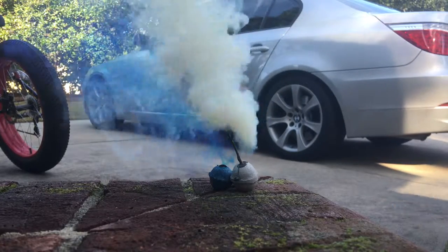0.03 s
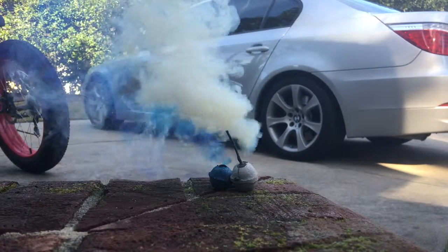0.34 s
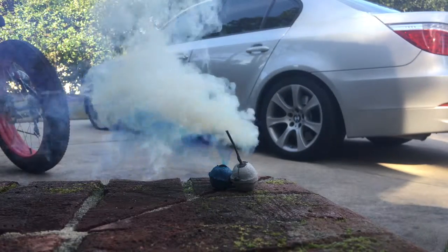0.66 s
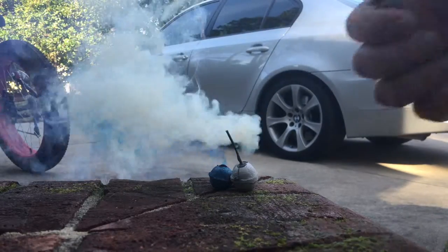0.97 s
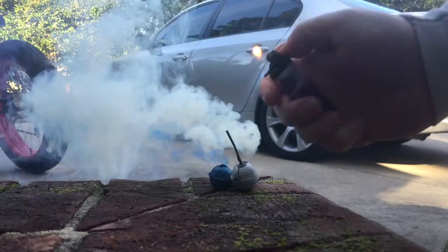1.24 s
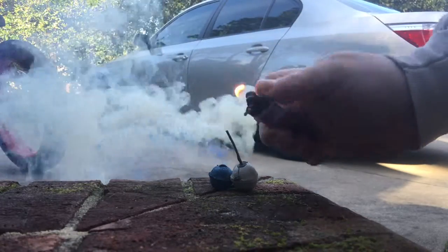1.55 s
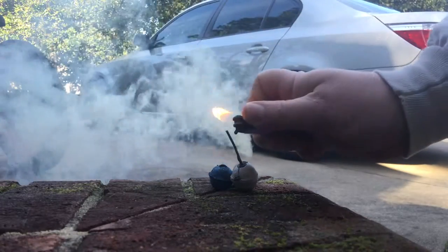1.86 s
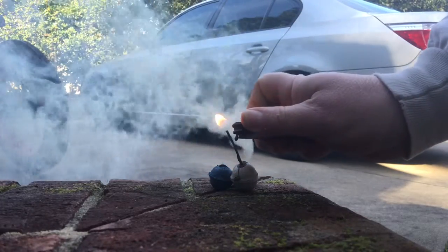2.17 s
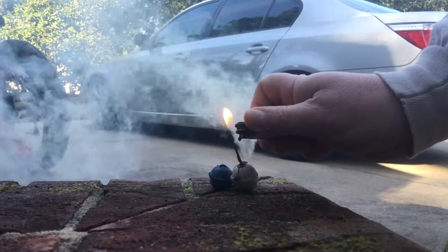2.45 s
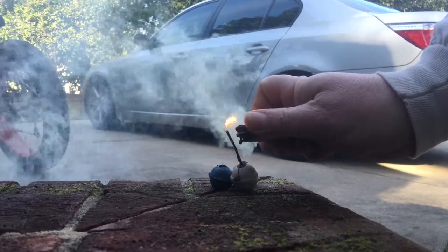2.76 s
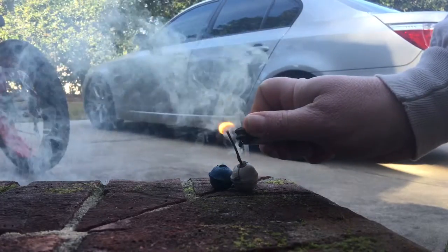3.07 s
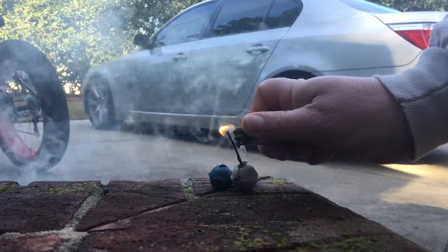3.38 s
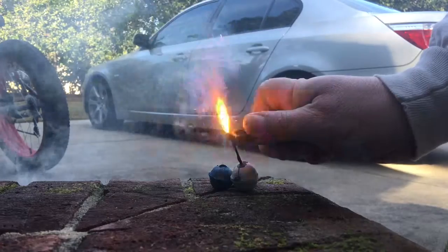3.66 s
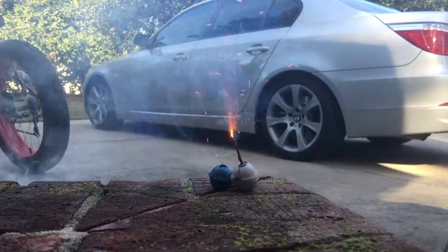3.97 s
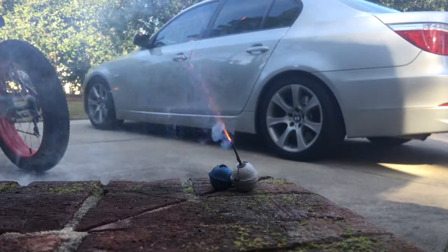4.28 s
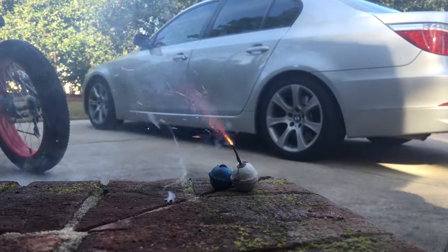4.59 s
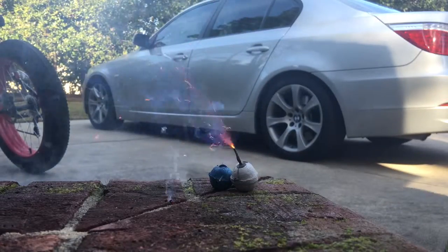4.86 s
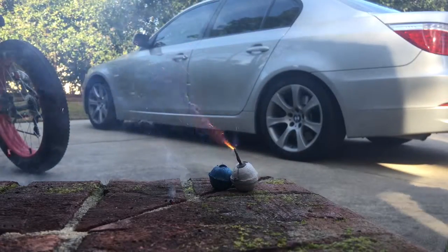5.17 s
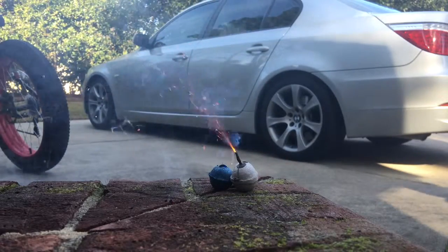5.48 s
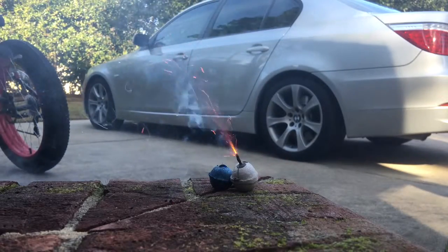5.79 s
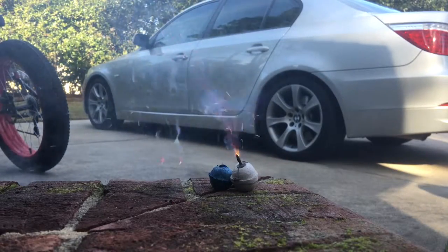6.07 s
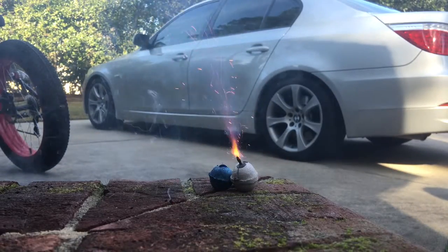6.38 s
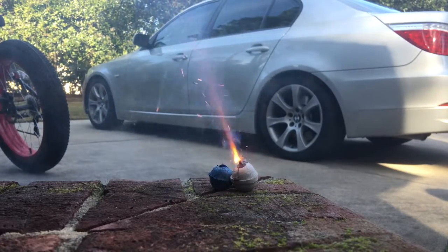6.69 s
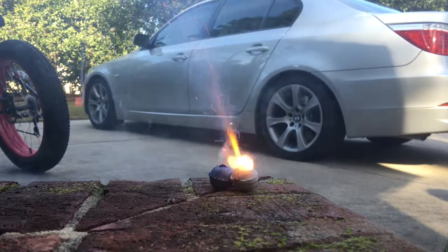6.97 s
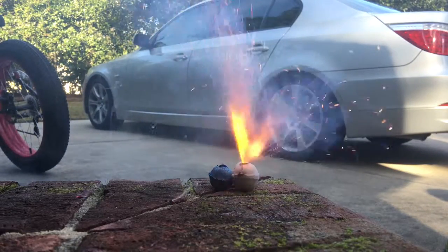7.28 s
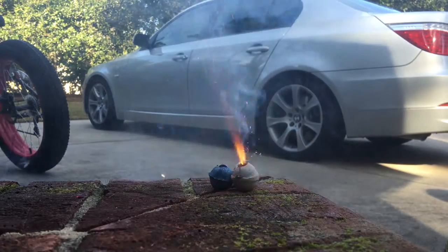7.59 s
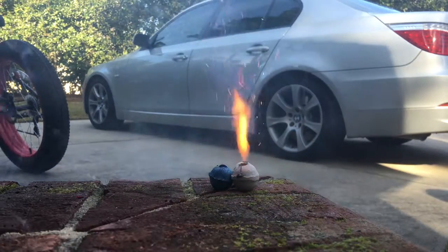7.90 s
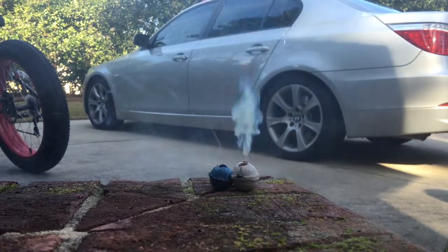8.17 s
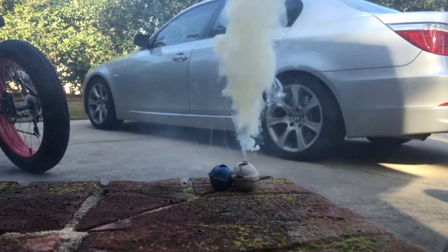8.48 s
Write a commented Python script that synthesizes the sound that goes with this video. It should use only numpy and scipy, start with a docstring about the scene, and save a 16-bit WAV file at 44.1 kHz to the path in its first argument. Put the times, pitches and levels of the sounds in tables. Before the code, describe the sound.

Close by on an outdoor step, one short lighter rasp cuts through the weak, gritty puffing of a dying smoke ball. A fuse then takes fire and hisses and spits unevenly, with a small flame fluttering beneath it later on. Loud rushing bursts follow as the fire enters the shell, giving way to a quiet hiss of smoke. Distant traffic and idling engines hum faintly throughout.

```python
"""A smoke ball's fuse catches, hisses and spits as it burns down, flares as it enters the shell and gives
way to a soft jet of smoke. The hiss is a fluttering gas jet full of bursting powder grains; a flame
flaps at the vent. Before the fuse catches, a spent ball sputters out and a flint lighter is struck.
Both balls sit on a brick step outdoors, close to a phone. Distant traffic rumbles underneath."""
import sys
import numpy as np
from scipy import signal
from scipy.fft import rfft, irfft, next_fast_len
from scipy.io import wavfile

SR = 44100
rng = np.random.default_rng(int(sys.argv[2]) if len(sys.argv) > 2 else 0)


def bounce(signal):
    """Save signal as a 16-bit WAV file at the path given by the first command-line argument."""
    frames = np.transpose(np.atleast_2d(signal))
    limited = np.clip(frames, -1, 1)
    pcm = np.round(limited * 32767).astype(np.int16)
    wavfile.write(sys.argv[1], SR, pcm)


N = 376613
T = np.arange(N) / SR
CATCH_S = 3.724  # fuse takes fire


# Open jet spectrum: (frequency [Hz], relative density [dB])
JET_SPECTRUM = [(100, -8), (250, -9), (600, -4.5), (1200, -6), (2700, -3), (4700, -1.5), (8000, -1),
                (10000, -1.5), (13000, -4.5), (15800, -9)]
# Broad dip in the hiss, climbing as the fuse shortens: (time [s], centre [Hz], depth [dB])
HISS_HOLLOW = [(3.8, 6600, 3), (3.93, 6540, 8.5), (4.15, 8400, 6.5), (4.6, 9200, 7), (5.1, 9700, 8),
               (5.6, 10570, 8.5), (6.2, 10900, 4.5), (7.25, 11000, 6.5), (7.42, 7350, 11.5),
               (7.7, 10700, 6.5), (8.0, 12500, 2)]

def fuse(grit_db=-6, hollow_width_hz=3400, catch_rise_s=0.0079):
    """Powder grains burst in a fluttering gas jet, with a hollow body below and sparks sizzling on top."""
    gas = rng.standard_normal(N)
    jet, body, sizzle = burn_gains()
    # harder burning merges the spurts into an even rush
    spurts = np.clip((-8 - 20 * np.log10(jet)) / 22, 0, 1)
    source = unit(gas + spurts * undb(grit_db) * crackle(rate_hz=2600, spread_db=3.0))
    flutter_db = spurts * (1.03 * walk(70) + 0.26 * walk(450))
    hz, t, frames = signal.stft(unit(source * undb(flutter_db)), SR, nperseg=512)
    hz = hz[:, None]
    centre_hz, depth_db = curves(HISS_HOLLOW, t)
    dips_db = depth_db * bell(hz, centre_hz, hollow_width_hz) + comb_db(hz, t)
    colour = undb(spectrum(JET_SPECTRUM, hz) + port_db(hz) - dips_db)
    low = 1 / (1 + (hz / 1350) ** 8)
    high = 1 - 1 / (1 + (hz / 10200) ** 16)
    hiss = 0
    for share, strength in ((1 - low - high, jet), (low, body), (high, sizzle)):
        gain = colour * share
        gain = gain / np.sqrt(np.mean(gain ** 2, axis=0))
        hiss = hiss + signal.istft(frames * gain, SR)[1][:N] * strength
    caught = np.clip((T - CATCH_S) / catch_rise_s, 0, 1)
    return shape(hiss * caught, lambda hz: 1 - bell(hz, 0, 145))  # small jet, no deep bass


# Powder burn, fuse then shell: (time [s], jet level [dB])
BURN_LEVEL = [(3.73, -33.5), (4.35, -31.5), (4.7, -31.5), (5.68, -31), (5.78, -29), (6.3, -29.5),
              (6.5, -32.5), (6.73, -27), (6.87, -27), (6.93, -30.3), (7.13, -28), (7.46, -34), (7.83, -22),
              (7.975, -24.5), (8.025, -44.5), (8.39, -54.5), (8.53, -41.5)]
# Powder runs thin: (time [s], width [s], sizzle drop [dB])
BURN_FALTERS = [(3.893, 0.04, 8), (4.202, 0.051, 3), (4.373, 0.22, 3), (4.828, 0.061, 5.5),
                (4.962, 0.034, 3), (5.185, 0.028, 2.5), (5.298, 0.029, 4), (5.425, 0.046, 3),
                (5.67, 0.071, 4), (5.904, 0.049, 3.5), (6.02, .05, 4), (6.176, 0.081, 10.5),
                (7.007, 0.053, 1.5)]
# Powder pockets go up: (start [s], length [s], rise [s], jet [dB], body [dB], sizzle [dB])
BURN_FLARES = [(3.702, .18, 0.035, -31.5, -31.5, -44), (3.738, .08, 0.058, -30.5, -44, -25),
               (5.73, .09, 0.037, -35, -51, -40), (6.178, 0.077, .04, -35, -39.5, -50),
               (6.498, .06, .04, -50, -37.5, -52), (6.84, .04, .04, -45, -36, -55),
               (6.987, 0.052, .04, -44, -36.5, -58), (7.144, 0.12, 0.047, -12, -30.5, -20.5),
               (7.259, 0.04, .03, -31, -31.5, -45), (7.323, .09, .04, -44, -39, -36),
               (7.45, .06, 0.037, -43, -36.5, -50), (7.623, 0.084, .04, -29.5, -47, -37),
               (7.776, 0.035, 0.036, -29, -33, -33), (7.9, 0.047, .04, -32, -35.5, -31),
               (8.026, 0.13, 0.036, -51, -50, -60)]

def burn_gains(body_db=-11, sizzle_db=(1.4, -8), sizzle_fade_s=(4.6, 6.33)):
    """Jet, body and sizzle follow the burn, sink in each falter and leap in each flare."""
    lags_s, falls_db_per_s = (0, 0.021, 0), (265, 97, 330)  # jet, body, sizzle
    burn_db, = curves(BURN_LEVEL)
    falter_db = sum(db * bell(T, s, width_s) for s, width_s, db in BURN_FALTERS)
    steady_db = (burn_db - 0.62 * falter_db,
                 burn_db + body_db - 0.27 * falter_db,
                 burn_db + np.interp(T, sizzle_fade_s, sizzle_db) - falter_db)
    power = undb(steady_db) ** 2
    for start_s, length_s, rise_s, *levels_db in BURN_FLARES:
        for layer, db in enumerate(levels_db):
            flare = envelope(start_s + lags_s[layer], length_s, rise_s, falls_db_per_s[layer])
            power[layer] += (undb(db) * flare) ** 2
    return np.sqrt(power)


def comb_db(hz, t, start_hz=1022, climb_hz_per_s=62, width_hz=480, depth_db=9, fade_s=1.25):
    """Narrow notches, likely from the brick echo, climb and fade as the fuse shortens."""
    age_s = np.maximum(t - CATCH_S, 0)
    spacing_hz = start_hz + climb_hz_per_s * age_s
    notches = sum(bell(hz, k * spacing_hz, width_hz) for k in (5, 7, 8, 9))
    return depth_db * np.exp(-age_s / fade_s) * notches


# Flame spectrum: (frequency [Hz], relative density [dB])
FLAME_SPECTRUM = [(60, -22), (170, 3.5), (300, 5), (600, -0.5), (1200, -14), (2000, -17), (3500, -39),
                  (15800, -60)]

def flame(start_s=6.1, base_db=-45.5, growth_db_per_s=2.5):
    """A growing tongue of flame flaps at the vent until the smoke smothers it."""
    roar = shape(rng.standard_normal(N), lambda hz: undb(spectrum(FLAME_SPECTRUM, hz)))
    flapping = unit(roar * undb(0.95 * walk(45)))
    size = undb(base_db + growth_db_per_s * (T - start_s))
    return flapping * size * envelope(start_s, length_s=2.093, rise_s=.45, fall_db_per_s=170)


# Smoke hiss spectrum: (frequency [Hz], relative density [dB])
SMOKE_SPECTRUM = [(400, -11.5), (1200, 1), (2100, -1), (3200, -1.5), (5000, -0.5), (9000, -8.5),
                  (15800, -12)]
# Dying flow: (time [s], level [dB])
SMOKE_LEVEL = [(0, -58), (.35, -57), (.7, -64.5), (1.15, -68), (1.45, -64), (1.7, -66), (2.45, -64.5),
               (2.85, -69.5), (3.02, -81)]
# Last puffs: (time [s], width [s], hiss level [dB], throat level [dB])
SMOKE_PUFFS = [(0.895, .06, -60.5, -70), (1.076, 0.028, -57, -74), (2.262, 0.13, -56.5, -70),
               (2.476, 0.078, -62, -75), (2.577, 0.045, -70, -68), (2.75, .05, -64, -62),
               (2.945, .035, -64, -75), (3.16, .02, -67, -77), (3.3, .025, -66, -73)]

def spent_ball(throat_hz=1950, throat_width_hz=920):
    """The last smoke leaves the spent ball in weakening, gritty puffs that sound its hollow throat."""
    gas = rng.standard_normal(N) + undb(-3) * crackle(rate_hz=760, spread_db=1.5)
    gas = shape(gas * undb(walk(60)), lambda hz: undb(spectrum(SMOKE_SPECTRUM, hz) + port_db(hz)))
    gas = gas / np.std(band(gas, 2500, 10000))
    throat = unit(shape(gas, lambda hz: bell(hz, throat_hz, throat_width_hz)))
    puff_gain, throat_gain = sum(undb(levels_db)[:, None] * bell(T, s, width_s)
                                 for s, width_s, *levels_db in SMOKE_PUFFS)
    flow_db, = curves(SMOKE_LEVEL)
    return (gas * np.hypot(undb(flow_db), puff_gain) + throat * throat_gain) * (T < CATCH_S)


# Flint rasp spectrum: (frequency [Hz], relative density [dB])
FLINT_SPECTRUM = [(200, -12.5), (650, -15), (1000, -10.5), (1350, -7.5), (2250, -5), (3200, -12.5),
                  (4700, -10), (5800, -1), (8000, -0.5), (10000, -8), (15800, -9)]
# Case and metal hood resonances: (centre [Hz], width [Hz], gain [dB])
HOOD_MODES = [(1820, 75, 9.5), (5870, 130, 2.5), (6270, 110, 3), (7200, 150, -0.5), (11410, 180, 7)]

def lighter():
    """The wheel's teeth rasp over the flint and ring the hood, harder until the thumb slips off."""
    rasp = .6 * rng.standard_normal(N) + crackle(rate_hz=3500, spread_db=2.5)
    hz = np.fft.rfftfreq(2048, 1 / SR)
    hood_db = sum(db * bell(hz, centre_hz, width_hz) for centre_hz, width_hz, db in HOOD_MODES)
    # minimum phase: starts at once, rings on
    cepstrum = irfft(np.log(undb(spectrum(FLINT_SPECTRUM, hz) + hood_db)))
    cepstrum[1:len(hz) - 1] *= 2
    cepstrum[len(hz):] = 0
    ring = irfft(np.exp(rfft(cepstrum)))
    return signal.fftconvolve(unit(rasp) * thumb_stroke(), ring / np.linalg.norm(ring))[:N]


def thumb_stroke(grip_s=1.187, peak_s=1.2125, stop_s=1.2225, stroke_db=-22.5, bite_db=-16.5, fizz_db=-46.5):
    """The wheel grips, speeds up, bites and throws sparks, then stops; the sparks fizz on."""
    rise_db_per_s, fall_db_per_s, fizz_fall_db_per_s = 600.5, 300, 299
    grip_rise_s, bite_width_s = 0.0084, 0.0053
    grip = np.clip((T - grip_s) / grip_rise_s, 0, 1)
    below_peak_db = np.maximum(rise_db_per_s * (peak_s - T), fall_db_per_s * (T - peak_s))
    bite = undb(bite_db) * bell(T, peak_s, bite_width_s)
    turning = grip * np.hypot(undb(stroke_db - below_peak_db), bite)
    fizz = undb(fizz_db - fizz_fall_db_per_s * np.abs(T - stop_s))
    return np.where(T < stop_s, turning, fizz)


# Small snaps: (time [s], peak before trim [dB], centre [Hz])
TICK_EVENTS = [(0.813, -37, 8660), (1.251, -34, 10000), (1.286, -35, 11000), (2.819, -34, 12100),
               (3.3736, -32, 12000), (3.399, -36.5, 12100), (3.5773, -37, 11500), (3.5816, -35, 15200),
               (3.711, -41, 8280), (8.3492, -29, 7500)]

def ticks(decay_s=0.00082, width_hz=18000, top_hz=15850, trim_db=-1.0):
    """Lighter, heating fuse tip and shell give bright snaps about a millisecond long."""
    out, t = np.zeros(N), T[:512]
    hz = np.fft.rfftfreq(len(t), 1 / SR)
    for s, db, centre_hz in TICK_EVENTS:
        colour = bell(hz, centre_hz, width_hz) * undb(port_db(hz)) * (hz > 1200) * (hz < top_hz)
        noise = irfft(rfft(rng.standard_normal(len(t))) * colour)
        snap = noise * t * np.exp(-2 * t / decay_s)
        start = int(s * SR)
        out[start:start + len(t)] += undb(db + trim_db) * snap / np.abs(snap).max()
    return out


# Distant traffic spectrum: (frequency [Hz], relative density [dB])
TRAFFIC_SPECTRUM = [(20, -44), (32, -30), (48, -7.5), (62, -6.5), (76, -8.5), (99, -2.5), (126, -2.5),
                    (160, -12), (240, -13), (380, -20), (500, -29), (1000, -29), (1800, -39), (2500, -46)]
# Idling engines: (pitch [Hz], peak level [dB], peak time [s], slope either side [dB/s])
ENGINE_NOTES = [(78.2, -44.5, 3.7, 3), (76.3, -46.5, 7.3, 3.5), (124.2, -52, 1.8, 3), (123, -42, 8.9, 2.5),
                (239.4, -55, 1.25, 11)]

def traffic(rumble_db=-44, wash_db=-56.5, wash_fade_db_per_s=1.5):
    """Low rumble, a fading wash of tyres and the wavering notes of idling engines."""
    road = shape(rng.standard_normal(N),
                 lambda hz: undb(spectrum(TRAFFIC_SPECTRUM, hz)) / (1 + (hz / 2200) ** 4))
    low = shape(road, lambda hz: 1 / (1 + (hz / 380) ** 4))
    rumble = low / np.std(band(road, 40, 140)) * undb(rumble_db)
    wash = (road - low) / np.std(band(road, 545, 1400)) * undb(wash_db - wash_fade_db_per_s * T)
    engines = 0
    for hz, db, peak_s, slope_db_per_s in ENGINE_NOTES:
        phase = 2 * np.pi * np.cumsum(hz * (1 + .018 * walk(12))) / SR
        note = unit(np.sin(phase) * undb(2.2 * walk(15)))
        engines = engines + undb(db - slope_db_per_s * np.abs(T - peak_s)) * note
    return rumble + wash + engines


def faint_hiss(level_db=-71.5, corner_hz=4500):
    """A thin, even hiss lies under everything."""
    hiss = shape(rng.standard_normal(N), lambda hz: undb(port_db(hz) / 2) / np.hypot(1, hz / corner_hz))
    return undb(level_db) * unit(hiss)


def driveway(x, t60_s=0.15, wet_db=-29, delay_s=.008):
    """Car and house scatter a short, faint tail."""
    t = T[:SR // 2]
    tail = rng.standard_normal(len(t)) * undb(-60 * t / t60_s) * (t > delay_s)
    return x + undb(wet_db) * signal.fftconvolve(x, tail / np.linalg.norm(tail))[:N]


# Microphone port resonances and dips: (centre [Hz], width [Hz], gain [dB])
PORT_MODES = [(1900, 920, 7.5), (2820, 390, -2), (3560, 1160, 4.5), (4710, 960, -3), (5300, 330, 2.5),
              (7170, 520, 2), (7680, 340, -3), (8820, 1400, 3.5), (10520, 860, -4), (12110, 670, 3),
              (13300, 590, 2), (14130, 320, 1.5)]

def port_db(hz):
    """The microphone port colours nearby hiss."""
    return sum(db * bell(hz, centre_hz, width_hz) for centre_hz, width_hz, db in PORT_MODES)


def undb(db):
    """Decibels to gain."""
    return 10 ** (np.asarray(db) / 20)


def unit(x):
    """Scale to rms 1."""
    return x / np.sqrt(np.mean(x ** 2))


def curves(table, t=T):
    """Table columns, linearly interpolated in time."""
    s, *columns = np.transpose(table)
    return [np.interp(t, np.sort(s), column) for column in columns]


def spectrum(points, hz):
    """Level in dB, interpolated over log frequency."""
    points_hz, db = np.transpose(points)
    return np.interp(np.log(hz + 1), np.log(points_hz), db)


def bell(x, centre, width):
    """Gaussian of height 1; full width at half height."""
    return .5 ** ((2 * (x - centre) / width) ** 2)


def envelope(start_s, length_s, rise_s, fall_db_per_s):
    """Swell toward 1, hold, decay once the length is over."""
    swell = np.clip((T - start_s) / rise_s, 0, 1) ** 2
    return swell * undb(-fall_db_per_s * np.maximum(T - start_s - length_s, 0))


def shape(x, gain):
    """Filter by a function of frequency."""
    size = next_fast_len(N + 4096)
    hz = np.fft.rfftfreq(size, 1 / SR)
    return irfft(rfft(x, size) * gain(hz), size)[:N]


def band(x, lo_hz, hi_hz):
    """Hard-edged band-pass."""
    return shape(x, lambda hz: (hz > lo_hz) & (hz < hi_hz))


def walk(rate_hz):
    """Smooth random drift, rms 1."""
    knots = rng.standard_normal(int(N / SR * rate_hz) + 2)
    return unit(np.interp(T * rate_hz, np.arange(len(knots)), knots))


def crackle(rate_hz, spread_db):
    """Random impulses, a few much stronger than the rest."""
    size = undb(spread_db * np.minimum(rng.exponential(size=N), 4))
    return unit((rng.random(N) < rate_hz / SR) * size * rng.choice([-1, 1], N))


def scene():
    """One microphone, the same in both channels."""
    near = fuse() + flame() + spent_ball() + lighter() + ticks()
    mono = driveway(near) + traffic() + faint_hiss()
    return np.array([mono, mono])


def record(dry):
    """The phone rounds the highest peaks and cuts the top."""
    ceiling, top_hz = .76, 15850
    rounded = dry / (1 + (dry / ceiling) ** 6) ** (1 / 6)
    return signal.sosfilt(signal.ellip(12, .1, 80, top_hz, fs=SR, output="sos"), rounded)


dry = scene()
out = record(dry)
bounce(out)
```